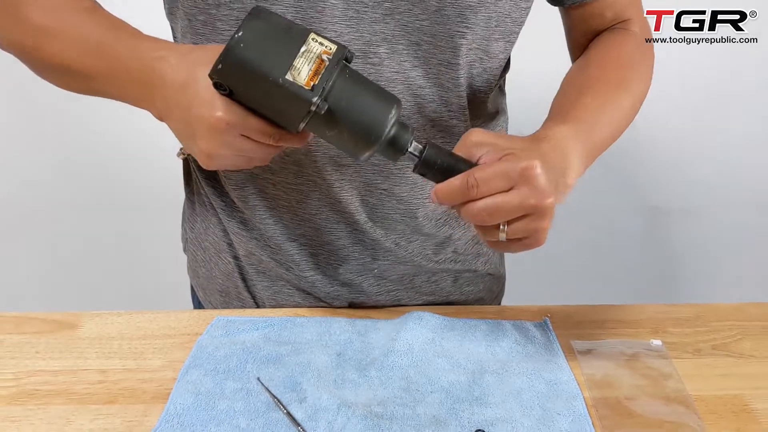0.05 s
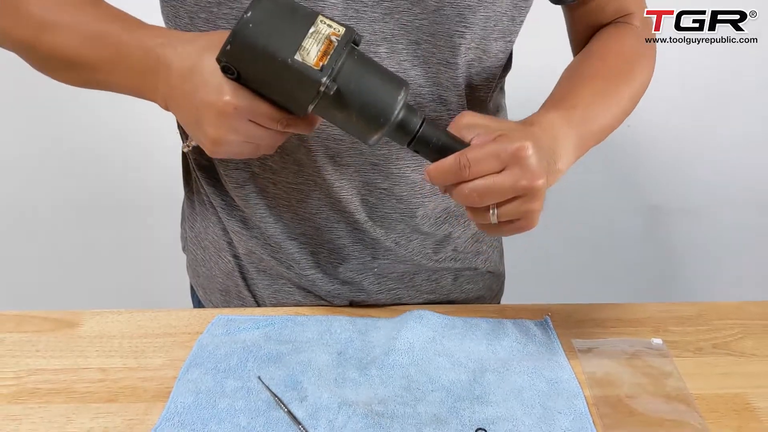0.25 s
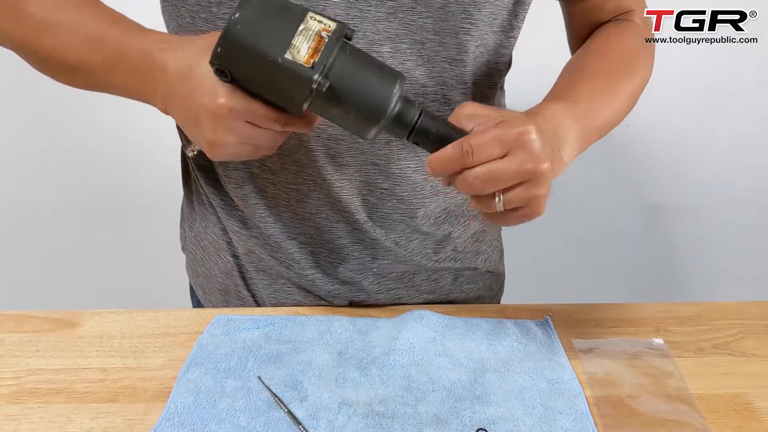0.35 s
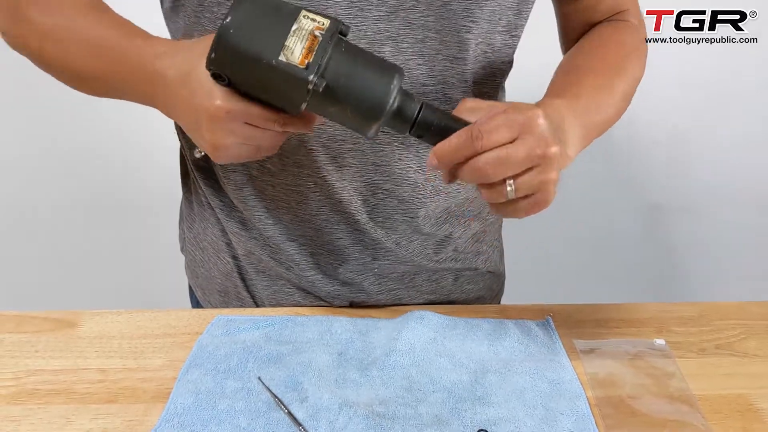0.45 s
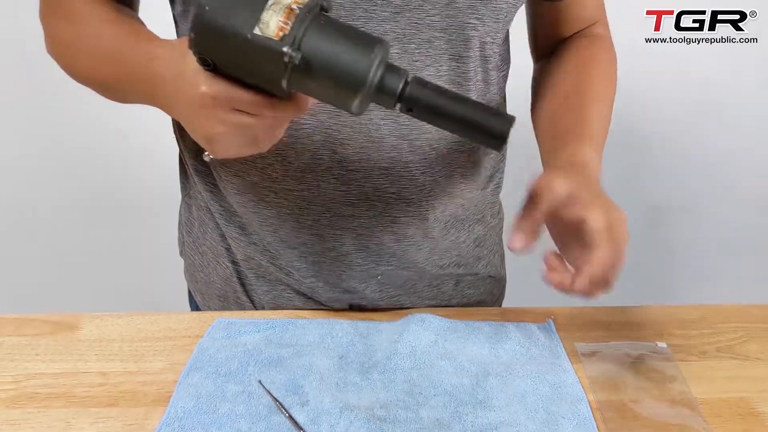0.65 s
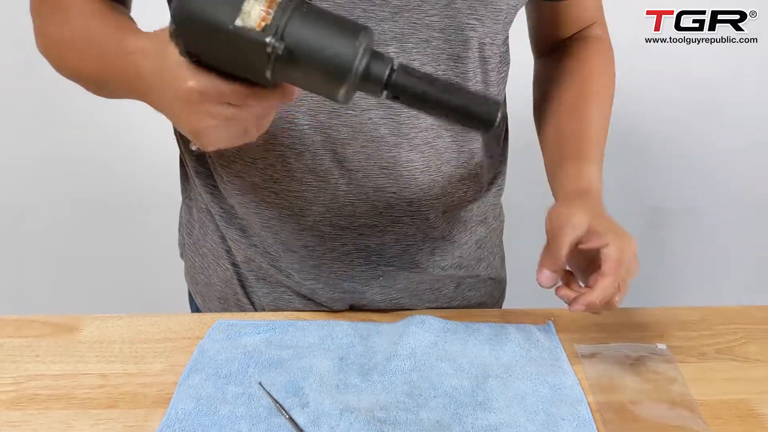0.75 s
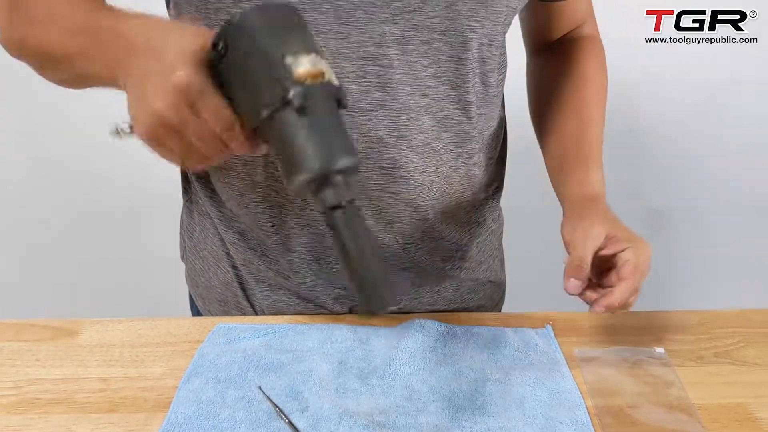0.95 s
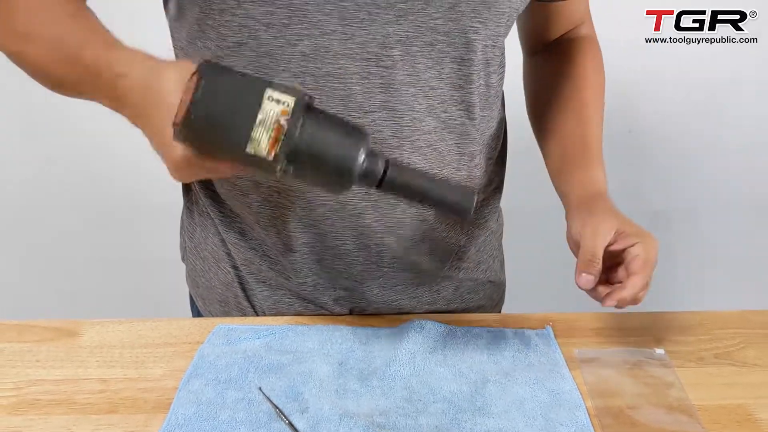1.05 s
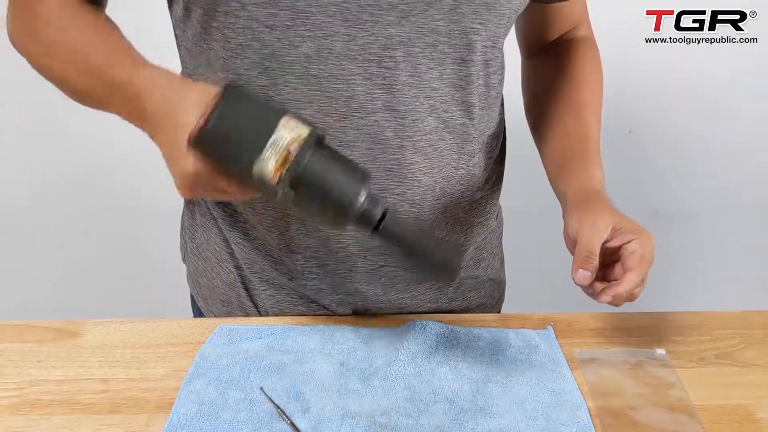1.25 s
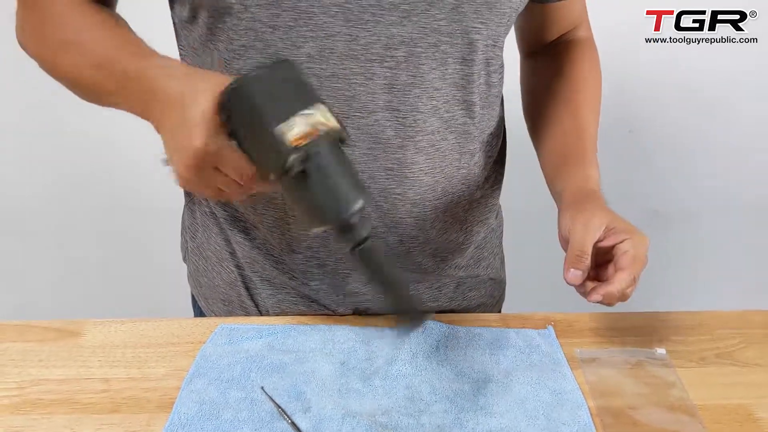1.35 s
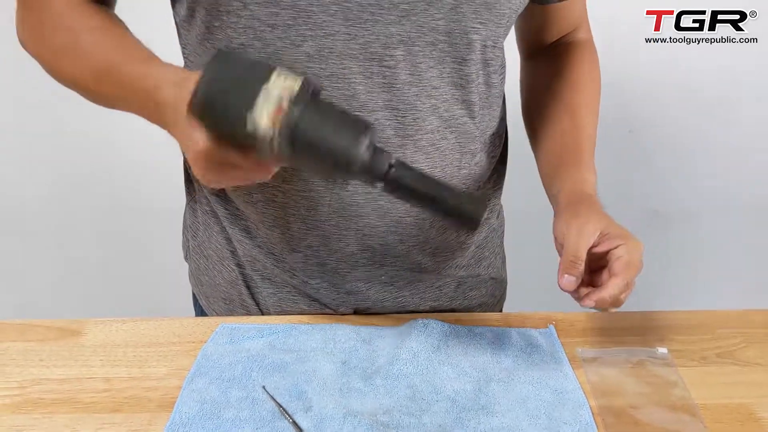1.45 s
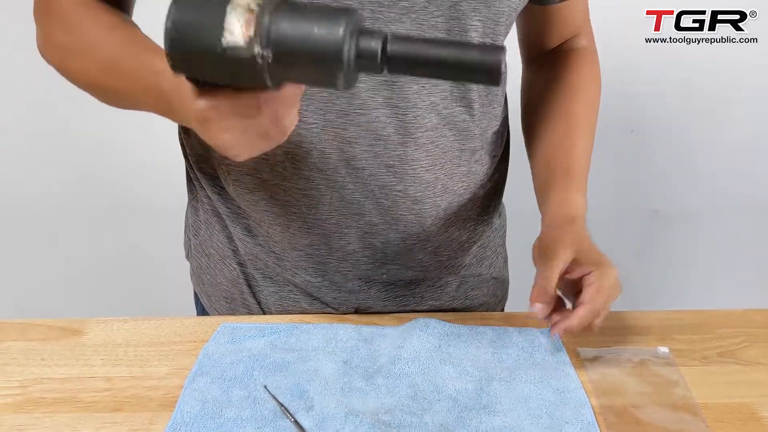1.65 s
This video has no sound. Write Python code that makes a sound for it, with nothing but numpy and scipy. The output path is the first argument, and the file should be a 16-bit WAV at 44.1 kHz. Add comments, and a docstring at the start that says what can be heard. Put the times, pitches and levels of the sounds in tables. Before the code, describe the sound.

A steel socket taps, slides and snaps sharply onto an impact wrench, then clicks into its seat. The tool is shaken and the socket rattles lightly, close up in a small room with a faint hum.

```python
"""A light steel tap over quiet room hum: a socket touches the anvil of an impact wrench.
It slides, snaps home with a thud of the housing, then clicks into its seat. The tool is shaken;
the socket rattles in its play and a loose part tinkles. Each contact is a few ms of chatter
ringing the steel modes. A small room answers. Behind: room air, mains hum, a far motor and a
faint high whistle."""
import sys
import numpy as np
from scipy import signal
from scipy.fft import rfft, irfft
from scipy.io import wavfile

SR = 44100
rng = np.random.default_rng(int(sys.argv[2]) if len(sys.argv) > 2 else 0)


def materialize(psi):
    """Save the field psi as 16-bit PCM at rate SR to the path in sys.argv[1].

    A 1-D psi becomes a single channel; in a 2-D psi each row is a channel.
    """
    bounded = np.clip(np.atleast_2d(psi).T, -1, 1)
    quanta = np.round(bounded * 32767).astype(np.int16)
    wavfile.write(sys.argv[1], SR, quanta)


N = 74970
T = np.arange(N) / SR

# room air: f/Hz, relative density/dB
AIR_SPECTRUM = [(20, -25), (45, -3.5), (70, 1), (140, -2.5), (400, -13.5), (750, -19.5), (1330, -20.5),
                (1600, -26.5), (2600, -19.5), (3500, -32), (4700, -34), (7100, -31.5), (11500, -35.5),
                (15000, -45.5)]
# mains hum: f/Hz, level/dB, left-right/dB
MAINS_LINES = [(60.8, -58.5, -0.5), (115.3, -62, 6)]
# far motor: t/s, f/Hz, main level/dB, upper level/dB
MOTOR_TRACK = [(0, 142.3, -61, -68), (0.382, 149, -62.5, -70.5), (0.699, 152.6, -61, -62),
               (1.238, 156, -57.5, -63.5), (1.42, 164.4, -61, -73), (1.56, 162, -51, -63.5),
               (1.7, 147.4, -49, -56.5)]
# whistle: t/s, f/Hz, level/dB
WHISTLE_TRACK = [(.45, 10400, -86), (.55, 12000, -73), (.66, 13500, -82), (.83, 10850, -72),
                 (.94, 11100, -75), (1.25, 10600, -100), (1.55, 11400, -77)]
# room decay: f/Hz, t60/s
ROOM_DECAY = [(300, 0.17), (1000, 0.27), (2600, 0.47), (6000, 0.43), (14000, 0.36)]
# room colour: f/Hz, relative level/dB
ROOM_SPECTRUM = [(300, 11), (600, 9.5), (1200, 11), (2500, 2.5), (3600, 4.5), (6500, -4), (14000, 3.5)]
# socket slides: peak t/s, decay time/s, level/dB
SCRAPE_EVENTS = [(0.221, 0.0051, -37.5), (.967, 0.0043, -47.5), (1.015, 0.014, -54.5), (1.144, .012, -57),
                 (1.22, 0.018, -55.5), (1.326, 0.0047, -51), (1.405, 0.018, -50)]
# sliding friction: f/Hz, relative density/dB
SCRAPE_SPECTRUM = [(200, -14), (500, 1.5), (1300, 1.5), (2700, -0.5), (4700, -11.5), (7100, -9.5),
                   (15000, -34)]
# loose part: t/s, level/dB
TINKLE_EVENTS = [(1.3051, -56), (1.4887, -55)]
# housing: f/Hz, relative level/dB, t60/s
HOUSING_MODES = [(264, -7, 0.029), (397, -0.5, 0.025), (600, 0, 0.037)]
# socket and wrench, four registers: f/Hz, relative level/dB, t60/s
KNOCK_MODES = [(600, -6, 0.012), (950, 1, 0.015), (1800, 3, 0.027)]
RING_MODES = [(2320, -9.5, 0.0089), (2602, 0.5, 0.014)]
CLINK_MODES = [(3700, -2.5, 0.0089), (5460, 10.5, 0.0074), (6220, 9, 0.0065), (7094, 11, 0.015),
               (8580, 8.5, 0.0065)]
TICK_MODES = [(10020, 3, 0.0089), (11350, 0, 0.016), (12570, -5.5, 0.042)]
# register limits, knock to tick: f/Hz
BAND_EDGES_HZ = [620, 2100, 3150, 8900, 13000]
# register image, knock to tick: noise correlation, left-right/dB
REGISTER_STEREO = [(0.93, 2), (0.74, -3), (0.16, -2), (.1, 1.5)]
# steel on steel: t/s, chatter/s, hollow mode f/Hz, knock/dB, ring/dB, clink/dB
CONTACT_EVENTS = [ (0.128, 0.0034, 754, -47, -43.5, -56.5), (0.215, 0.0089, 1280, -35, -34, -39.5),
                  (0.2239, 0.0035, 1203, -29, -23, -16.5), (0.5988, 0.0052, 1600, -42.5, -49, -29.5),
                  (0.603, 0.005, 1720, -38, -35, -48), (0.6073, 0.0014, 1047, -33.5, -41.5, -23),
                  (0.9112, 0.0035, 1950, -50.5, -52.5, -52), (0.9269, 0.0081, 1730, -49, -49.5, -53.5),
                  (0.9686, 0.0029, 1346, -34.5, -35.5, -27), (0.99, 0.0057, 1380, -39.5, -38.5, -29),
                  (0.9964, 0.0039, 1020, -47, -41.5, -44), (1.0452, 0.0023, 1400, -65, -69, -49.5),
                  (1.0963, 0.0028, 950, -51.5, -62, -75), (1.134, 0.002, 1400, -54, -45.5, -56),
                  (1.1384, 0.0018, 1350, -42.5, -46, -54.5), (1.1965, 0.0047, 1500, -48.5, -51, -43),
                  (1.2284, 0.004, 900, -42, -45, -44.5), (1.2458, .002, 1440, -65, -58, -48),
                  (1.2957, 0.0037, 860, -51.5, -60, -67), (1.3256, 0.0049, 1390, -44.5, -34.5, -44),
                  (1.3808, 0.0052, 1350, -47.5, -48.5, -42), (1.404, 0.0048, 935, -43, -44.5, -49),
                  (1.476, 0.0022, 1930, -49, -55.5, -63.5), (1.5174, 0.0043, 1274, -57, -43, -63),
                  (1.5233, 0.003, 1360, -48.5, -48, -54.5)]
# whole socket snapping home: f/Hz, level/dB, t60/s
SOCKET_MODES = [(1854, -30, .016), (2558, -17, .0095), (3710, -27.5, .009), (6110, -30, 0.0042),
                (10270, -27, 0.0017)]


def from_db(db):
    """Decibels to gain."""
    return 10 ** (np.asarray(db) / 20)


def unit(x):
    """Unit energy per channel."""
    return x / np.sqrt(np.sum(x ** 2, axis=-1, keepdims=True) + 1e-20)


def pan(db):
    """Stereo gains for a left-right difference."""
    return from_db([[db / 2], [-db / 2]])


def at_hz(points, hz):
    """Table lookup over log frequency."""
    f, value = np.transpose(points)
    return np.interp(np.log(np.maximum(hz, 1)), np.log(f), value)


def stereo_noise(size, correlation):
    """White noise, partly shared by both channels."""
    mid, side = rng.standard_normal((2, size))
    return np.sqrt(1 + correlation) * mid + np.sqrt(1 - correlation) * side * np.array([[1], [-1]])


def colour(x, spectrum):
    """Spectral shaping to unit rms."""
    gain = from_db(at_hz(spectrum, np.fft.rfftfreq(N, 1 / SR)))
    return np.sqrt(N) * unit(irfft(rfft(x) * gain, N))


def band(x, low_hz, high_hz):
    """Causal band-pass."""
    return signal.sosfilt(signal.butter(2, [low_hz, high_hz], "band", fs=SR, output="sos"), x)


def tone(hz, rms_db):
    """Sine with random start phase."""
    cycles = np.cumsum(hz * np.ones(N)) / SR + rng.random()
    return np.sqrt(2) * from_db(rms_db) * np.sin(2 * np.pi * cycles)


def resonate(x, hz, t60_s):
    """One damped mode."""
    r = np.exp(-np.log(1000) / (t60_s * SR))
    return signal.lfilter([1, 0, -1], [1, -2 * r * np.cos(2 * np.pi * hz / SR), r * r], x)


def place(sound, at_s, right_lag_s=.00005, span_s=.005):
    """Start at at_s, right channel later; unit energy becomes unit rms over span_s."""
    out = np.zeros((2, N + SR))
    for channel, lag_s in enumerate((0, right_lag_s)):
        start = int((at_s + lag_s) * SR)
        out[channel, start:start + sound.shape[1]] = sound[channel] * np.sqrt(span_s * SR)
    return out[:, :N]


def air(rms_db=-53.5):
    """Steady room rumble and faint hiss."""
    return from_db(rms_db) * colour(stereo_noise(N, correlation=.52), AIR_SPECTRUM)


def mains_hum():
    """Two steady low lines."""
    return sum(tone(hz, db) * pan(pan_db) for hz, db, pan_db in MAINS_LINES)


def far_motor(upper_ratio=1.37, pan_db=-7):
    """Two-line drone: pitch rises slowly, then sags as the level swells."""
    times_s, *columns = np.transpose(MOTOR_TRACK)
    hz, main_db, upper_db = [np.interp(T, times_s, column) for column in columns]
    return (tone(hz, main_db) + tone(hz * upper_ratio, upper_db)) * pan(pan_db)


def whistle(upper_ratio=1.11, upper_db=-5):
    """Two faint, fluttering high tones gliding together."""
    times_s, *columns = np.transpose(WHISTLE_TRACK)
    hz, db = [np.interp(T, times_s, column) for column in columns]
    flutter = np.sqrt(N) * unit(band(rng.standard_normal(N), 10, 120))
    gate = (T > times_s[0]) & (T < times_s[-1])
    return gate * flutter * (tone(hz, db) + tone(hz * upper_ratio, db + upper_db))


def room(x, wet_db=-14.5, early_s=.016, early_db=-1.5):
    """Weak early bench reflections, then a diffuse wall tail, longest near 2.6 kHz."""
    t, edges_hz = T[:N // 2], np.geomspace(150, 18000, 11)
    white, response = rng.standard_normal((2, 2, len(t))), 0
    for k, (low_hz, high_hz) in enumerate(zip(edges_hz, edges_hz[1:])):
        hz = np.sqrt(low_hz * high_hz)
        decay = np.exp(-np.log(1000) * t / at_hz(ROOM_DECAY, hz))
        response += band(white[k % 2], low_hz, high_hz) * from_db(at_hz(ROOM_SPECTRUM, hz)) * decay
    onset = np.where(t < early_s, from_db(early_db) * t / early_s, 1)
    return from_db(wet_db) * signal.fftconvolve(x, unit(response * onset), axes=1)[:, :N]


def scrape(slips_per_s=1500):
    """Dense micro-slips swell and fade as the socket slides."""
    slips = (rng.random(N) < slips_per_s / SR) * stereo_noise(N, correlation=1)
    envelope = sum(from_db(db) * np.exp(-np.abs(T - peak_s) / decay_s)
                   for peak_s, decay_s, db in SCRAPE_EVENTS)
    return envelope * colour(slips, SCRAPE_SPECTRUM)


def chatter(length_s, correlation, rise_s=.00048, fall_s=.0017, blow_share=.3, blow_position=.7):
    """Steel faces meet: tiny impacts around one main blow carrying blow_share of the energy."""
    t = T[:6000]
    envelope = np.minimum(t / rise_s, 1) * np.exp(-np.maximum(t - length_s, 0) / fall_s)
    impacts = unit(envelope * stereo_noise(len(t), correlation))
    blow = np.arange(len(t)) == int(blow_position * length_s * SR)
    return np.sqrt(1 - blow_share) * impacts + np.sqrt(blow_share) * blow + 1e-18


def ring(x, modes, scatter=.026, full_scatter_hz=7460):
    """Modes of alternating sign; each contact point detunes them, the high ones most."""
    detune, out = scatter * rng.standard_normal(len(modes)), 0
    for k, (hz, db, t60_s) in enumerate(modes):
        detuned_hz = hz * (1 + detune[k] * min(hz / full_scatter_hz, 1))
        out += (-1) ** k * from_db(db) * unit(resonate(x, detuned_hz, t60_s))
    return unit(out)


def tinkles(hz=3950, t60_s=.016):
    """Shaking rings one mode of a small loose part."""
    out = 0
    for at_s, db in TINKLE_EVENTS:
        strike = chatter(length_s=.00048, correlation=.49)
        out += place(from_db(db) * unit(resonate(strike, hz, t60_s)), at_s)
    return out


def housing_thud(at_s=.2242, level_db=-37.5):
    """The snap jolts the heavy housing."""
    jolt = chatter(length_s=.00048, correlation=.86)
    return place(from_db(level_db) * ring(jolt, HOUSING_MODES), at_s)


def contact(length_s, hollow_hz, knock_db, ring_db, clink_db,
            hollow_db=14.5, crack_db=-1.5, tick_offset_db=-4.5):
    """Chatter drives four steel registers, each with modes plus an unpitched crack."""
    # hollow mode: shifts with grip and seating, damped by long chatter
    clean_t60_s, clean_chatter_s = .03, .0014
    hollow = (hollow_hz, hollow_db, clean_t60_s * clean_chatter_s / length_s)
    registers = KNOCK_MODES + [hollow], RING_MODES, CLINK_MODES, TICK_MODES
    levels_db = knock_db, ring_db, clink_db, clink_db + tick_offset_db
    out = 0
    for k, (correlation, pan_db) in enumerate(REGISTER_STEREO):
        low_hz, high_hz = BAND_EDGES_HZ[k:k + 2]
        crack = from_db(crack_db) * unit(band(chatter(length_s, correlation), low_hz, high_hz))
        ringing = ring(chatter(length_s, correlation), registers[k])
        sound = band(ringing + crack, low_hz * .79, high_hz * 1.23)
        out += from_db(levels_db[k]) * pan(pan_db) * unit(sound)
    return out


def socket_contacts(lowpass_hz=12900):
    """Socket against anvil: touch, seating, rattle."""
    steel = sum(place(contact(*settings), at_s) for at_s, *settings in CONTACT_EVENTS)
    return signal.sosfilt(signal.butter(2, lowpass_hz, fs=SR, output="sos"), steel)


def snap(at_s=.2256):
    """One hard blow locks the socket: a strong note and weaker modes swell briefly and die."""
    blow, note = (T == 0) + 1e-18, 0
    for hz, db, t60_s in SOCKET_MODES:
        swelling = resonate(resonate(blow, hz, t60_s), hz, t60_s)
        note += from_db(db) * pan(0) * unit(swelling)
    return place(note, at_s)


def scene(snap_send_db=-1.5):
    """Close socket and wrench, their room, the background."""
    note = snap()
    steel = socket_contacts() + housing_thud() + tinkles() + scrape()
    reverb = room(steel + from_db(snap_send_db) * note)
    background = air() + far_motor() + mains_hum() + whistle()
    return background + reverb + steel + note


def record(dry, port_hz=2557, port_q=8.6, port_db=6.5, cutoff_hz=16000):
    """Right microphone port resonance, then a steep low-pass on both channels."""
    b, a = signal.iirpeak(port_hz, port_q, fs=SR)
    right = dry[1] + (from_db(port_db) - 1) * signal.lfilter(b, a, dry[1])
    return signal.sosfilt(signal.ellip(10, .2, 80, cutoff_hz, fs=SR, output="sos"), [dry[0], right])


dry = scene()
out = record(dry)
materialize(out)
```